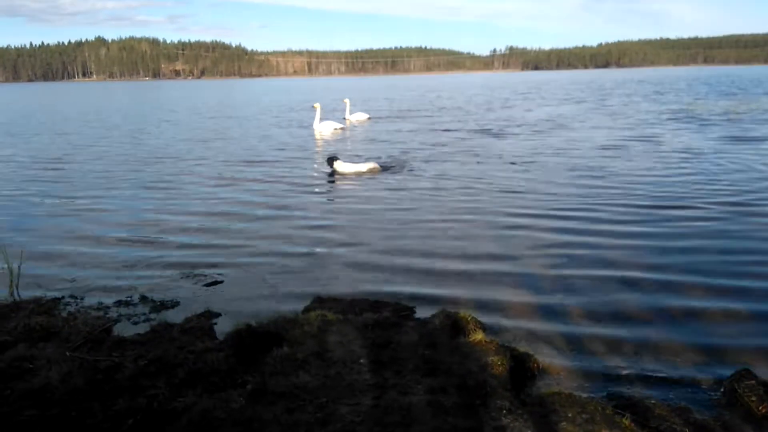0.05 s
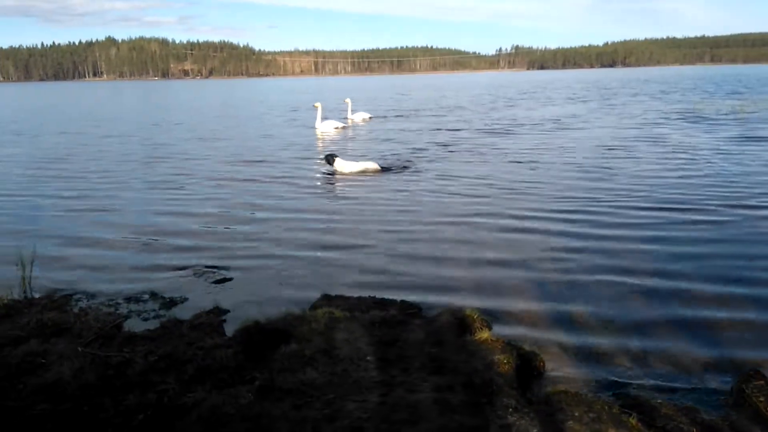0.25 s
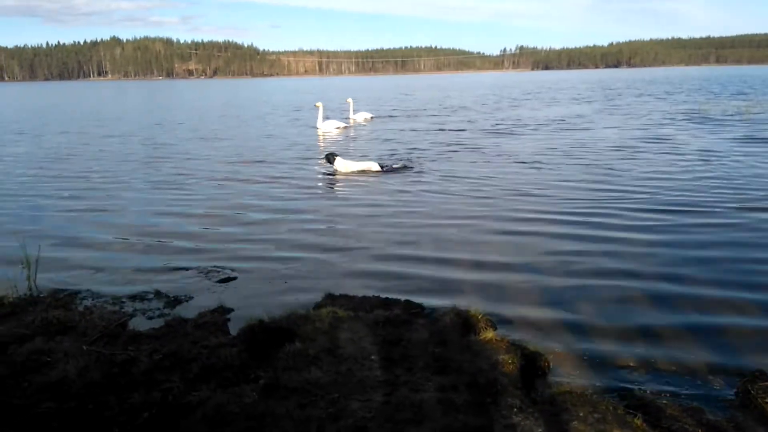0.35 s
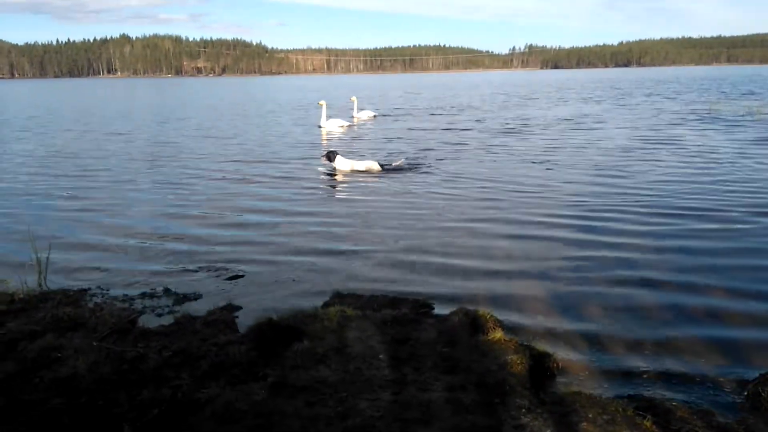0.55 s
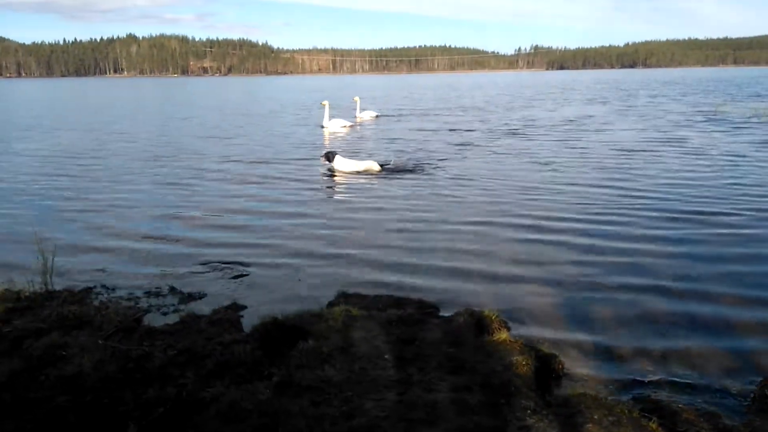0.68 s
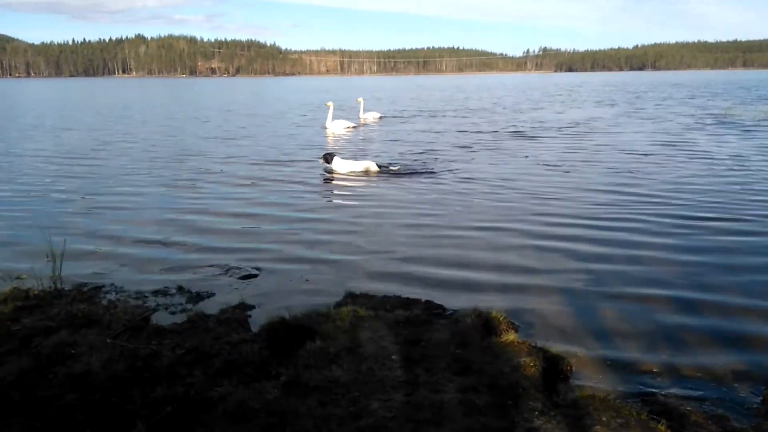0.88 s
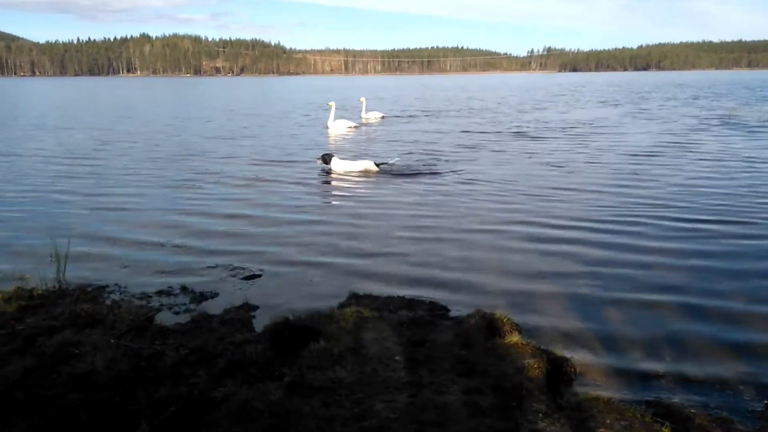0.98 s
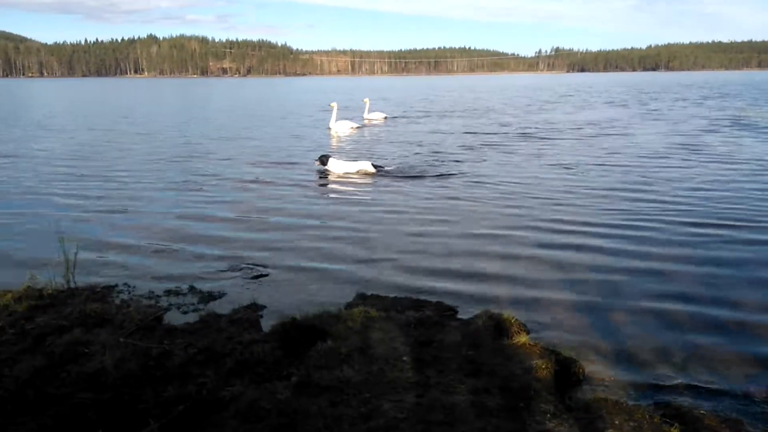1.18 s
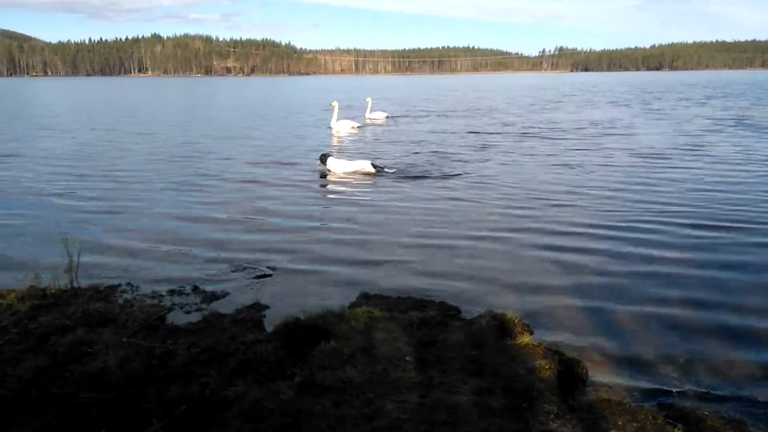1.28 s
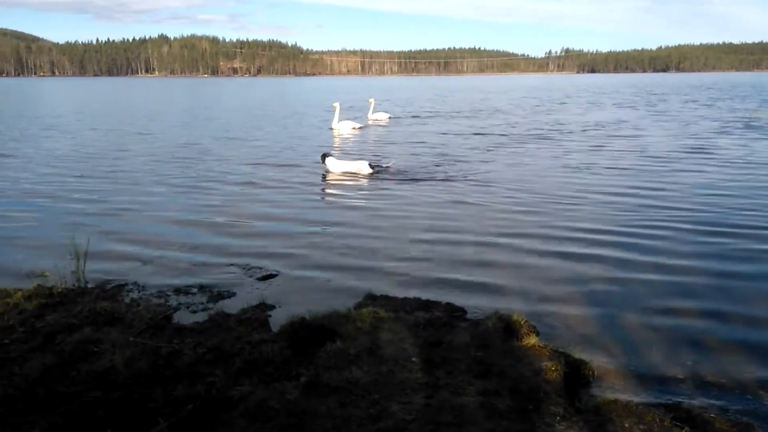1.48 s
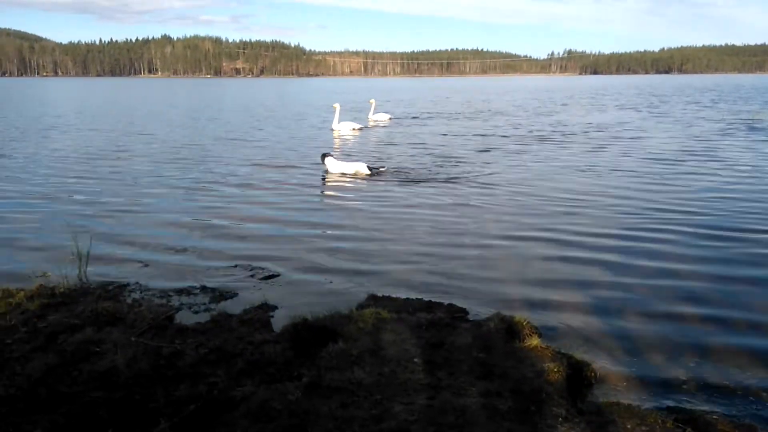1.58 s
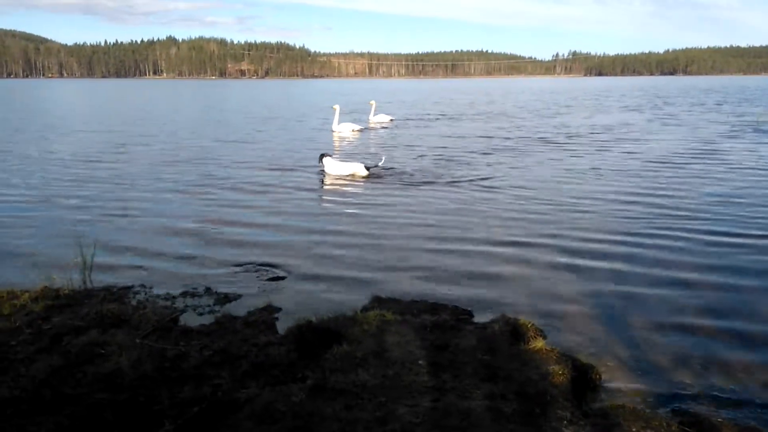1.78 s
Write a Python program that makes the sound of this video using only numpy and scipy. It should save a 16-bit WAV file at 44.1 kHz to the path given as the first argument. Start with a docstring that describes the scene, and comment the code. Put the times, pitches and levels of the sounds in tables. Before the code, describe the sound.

A swan honks loudly at about 0.2 seconds, a short, high bugle that cracks upward. A second swan replies from 0.4 to 0.5 seconds, lower and hoarser. Both calls leave a faint tail and a dull echo across the lake, fading by about 1 second. Low wind and thin ripples continue quietly throughout, with a few soft laps of water between 1.1 and 1.6 seconds, the clearest near 1.3.

```python
"""A low murmur of wind and a thin wash of ripples lie over a calm lake from start to end.
A swan honks, a high bugle that cracks upward; its windpipe rings as the call clears near the end.
The rocky shore scatters the sound and the forest round the lake returns a long faint tail.
A second swan gives a lower, hoarser reply, and then both calls come back dully from the far shore.
Last come a few soft laps and splashes."""
import sys
import numpy as np
from scipy import signal
from scipy.fft import rfft, irfft
from scipy.io import wavfile
from scipy.ndimage import uniform_filter1d, map_coordinates

SR = 44100
rng = np.random.default_rng(int(sys.argv[2]) if len(sys.argv) > 2 else 0)


def wav_out(sig):
    """Save sig, one row per channel (or a flat mono array), as 16-bit PCM at SR to the path in sys.argv[1]."""
    wavfile.write(sys.argv[1], SR, np.round(np.clip(np.atleast_2d(sig).T, -1, 1) * 32767).astype(np.int16))


N = 81585


def amp(db):
    """Turns decibels into a number to multiply by."""
    return 10 ** (np.asarray(db) / 20)


def unit(x):
    """Scales a signal to an average strength (rms) of 1."""
    return x / np.sqrt(np.mean(x ** 2) + 1e-20)


def by_hz(table, hz, column=1):
    """Reads between a table's rows by frequency, with octaves evenly spaced."""
    columns = np.transpose(table)
    return np.interp(np.log(hz + 1), np.log(columns[0] + 1), columns[column])


def by_time(table, t, column=1):
    """Reads between a table's rows by time."""
    columns = np.transpose(table)
    return np.interp(t, columns[0], columns[column])


def wobble(size, rate_hz):
    """A smooth random wiggle of strength 1, up to about the given speed."""
    hz = np.fft.rfftfreq(size, 1 / SR)
    return unit(irfft(rfft(rng.standard_normal(size)) / (1 + (hz / rate_hz) ** 4), size))


def add(mix, start_s, sound):
    """Mixes a stereo sound in at its start time."""
    part = mix[:, round(start_s * SR):][:, :sound.shape[1]]
    part += sound[:, :part.shape[1]]


def rushing_noise(tone, loudness, likeness, left_db, patchy_db, flicker_db):
    """Noise with drifting patches and a flicker; likeness (0 to 1) is how alike the two sides are."""
    frames, bands = N // 256 + 6, 513
    a, b, c, d, patches = rng.standard_normal((frames, bands, 5)).T
    patches = uniform_filter1d(patches, size=14, axis=0)  # smooth across frequency
    patches = unit(uniform_filter1d(patches, size=4, axis=1))  # and along time
    left = a + 1j * b
    right = likeness * left + np.sqrt(1 - likeness ** 2) * (c + 1j * d)
    patchy = np.array([left, right]) * amp(patchy_db * patches)
    noise = signal.istft(patchy, nperseg=1024, noverlap=768)[1][:, :N]
    noise = irfft(rfft(noise) * amp(by_hz(tone, np.fft.rfftfreq(N, 1 / SR))), N)
    noise = unit(noise * amp(flicker_db * wobble(N, 39)))
    return noise * amp(by_time(loudness, np.arange(N) / SR) + left_db * np.array([[.5], [-.5]]))


# The wind's mix of low and high sound: f/Hz, relative level/dB
WIND_TONE = [(20, -37.5), (80, -11.5), (120, -4.5), (225, 1.5), (290, -4), (375, -15.5), (530, -13),
             (750, -20.5), (1100, -33), (8000, -99)]
# How the wind swells and sinks: t/s, level/dB
WIND_LOUDNESS = [(0, -59.5), (.17, -56.5), (.28, -46.5), (0.374, -50), (0.482, -46.5), (0.569, -54),
                 (0.668, -50.5), (0.821, -54.5), (0.903, -47.5), (1.003, -57), (1.088, -52), (1.3, -53.5),
                 (1.362, -51), (1.43, -52), (1.85, -57.5)]
def wind():
    """Moving air murmurs low, almost alike in both ears."""
    return rushing_noise(WIND_TONE, WIND_LOUDNESS, likeness=.92, left_db=-2.5, patchy_db=1, flicker_db=1.47)


# The ripples' mix of low and high sound: f/Hz, relative level/dB
RIPPLE_TONE = [(100, -25), (600, 2.5), (2000, -1.5), (3900, -4), (4400, -10.5), (7000, -12), (14000, -15)]
# How loud the ripples are: t/s, level/dB
RIPPLE_LOUDNESS = [(0, -76), (.2, -71.5), (.9, -69.5), (1.28, -71), (1.38, -69.5), (1.85, -73)]
def ripples():
    """Tiny waves make a thin wash all around."""
    return rushing_noise(RIPPLE_TONE, RIPPLE_LOUDNESS,
                         likeness=0, left_db=0, patchy_db=2.24, flicker_db=-1)


TREBLE_HZ, RASP_CORNER_HZ, RING_WIDTH_HZ = 3530, 9100, 210
CATCH_S, RELEASE_S, CLEARING_S = .022, .016, .0033
JITTER_HZ, FLUTTER_HZ, FLUTTER_FADE_S = 237, 104.2, .046


def throat_gain(tone, hz):
    """How strongly each frequency of a voice reaches the left and right ear."""
    return amp([by_hz(tone, hz, column=1), by_hz(tone, hz, column=2)])


def rasp(phase, tone, bright_db):
    """A puff of air escapes with each vibration; its hiss thins out toward the low notes."""
    size = len(phase)
    hz = np.fft.rfftfreq(size, 1 / SR)
    puffs = rng.standard_normal((2, size)) * (1 + np.cos(phase))
    breath = rfft(puffs) * throat_gain(tone, hz) * hz / np.hypot(hz, RASP_CORNER_HZ)
    treble = hz ** 4 / (hz ** 4 + TREBLE_HZ ** 4)
    return irfft(breath * (1 - treble), size) + amp(bright_db) * irfft(breath * treble, size)


# How far a voice's wave runs ahead on the left side: f/Hz, lead/radians
LEFT_LEAD = [(600, 0.1594), (900, 0.13), (1700, 2.4), (3600, 7.76), (4500, 5.06), (14000, 9.1)]
def honk(call, tone, ring, clears_s, rasp_db, jitter, flutter, catch_jitter, release_jitter):
    """A firm note with quivering overtones and rasp; late in the call the windpipe rings."""
    t = np.arange(call[0][0], call[-1][0], 1 / SR)
    size, age = len(t), t - t[0]
    pitch = by_time(call, t)
    level = amp(by_time(call, t, column=2))
    bright_db = by_time(call, t, column=3)
    clear = .5 + .5 * np.tanh((t - clears_s) / CLEARING_S)
    hoarse = 1 - .5 * clear
    # The pitch shakes most as the voice catches and lets go; jitter and flutter are shares of it.
    unsteady = catch_jitter * np.exp(-age / CATCH_S) + release_jitter * np.exp((t - t[-1]) / RELEASE_S)
    waver = (jitter * hoarse + unsteady) * wobble(size, JITTER_HZ)
    waver += flutter * np.exp(-age / FLUTTER_FADE_S) * np.sin(2 * np.pi * FLUTTER_HZ * age)
    phase = 2 * np.pi * np.cumsum(pitch * (1 + waver)) / SR
    voice = np.zeros((2, size))
    for k in range(1, 20):
        hz = k * pitch
        angle = k * phase + by_hz(LEFT_LEAD, hz) * np.array([[.5], [-.5]])
        if k == 1:
            voice += amp(tone[0][1:])[:, None] * np.cos(angle)
        else:
            ring_db = clear * sum(db / (1 + ((hz - centre) / RING_WIDTH_HZ) ** 2) for centre, db in ring)
            effort_db = bright_db * (hz / TREBLE_HZ) ** .53  # higher overtones follow effort more
            shimmer_db = 2.4 * hoarse * wobble(size, FLUTTER_HZ)
            quiver = .11 * (hz / TREBLE_HZ) * hoarse * wobble(size, JITTER_HZ)
            gain = throat_gain(tone, hz) * amp(effort_db + ring_db + shimmer_db)
            voice += gain * np.cos(angle + quiver)
    breath = amp(rasp_db) * hoarse * rasp(phase, tone, bright_db) * (level / level.max()) ** .41
    out = np.zeros((2, N))
    add(out, t[0], (np.sqrt(2) * voice + breath) * level * signal.windows.tukey(size, .04))
    return out


# The first swan's call: t/s, pitch/Hz, level/dB, brightness/dB
BUGLE_CALL = [(.208, 755, -68, -45), (.213, 748, -42, -31), (.221, 764.5, -38, -9), (.228, 874, -33, -5),
              (.24, 904, -29.5, 3.5), (.247, 900, -23.5, -6), (.254, 900, -25, 2), (.265, 895, -25, -1),
              (.276, 900.3, -24, 2), (.287, 879.3, -27, 8), (.295, 936, -25, -8.5), (.301, 974, -36.5, -6),
              (.307, 968, -28, 2), (.322, 957.8, -31.5, -2), (.329, 954, -52, 2), (.338, 944.5, -36, -14),
              (.362, 800, -47.5, -10)]
# The tone of its voice: f/Hz, left level/dB, right level/dB
BUGLE_TONE = [(900, -3.5, 1), (1762, -19.5, -21.5), (2330, -51, -33), (2646, -27.5, -29),
              (2978, -17, -14.5), (3440, -13.5, -14.5), (4360, -15.5, -16.5), (5370, -22.5, -37),
              (5900, -54, -40.5), (7100, -46.5, -44), (8320, -32, -43.5), (9280, -37.5, -24.5),
              (9700, -41.5, -35.5), (13400, -45, -41)]
# Where its windpipe rings: f/Hz, boost/dB
BUGLE_RING = [(2900, 10.5)]
def first_swan():
    """A high bugle whose pitch cracks upward."""
    return honk(BUGLE_CALL, BUGLE_TONE, BUGLE_RING, clears_s=.312, rasp_db=8,
                jitter=.004, flutter=.03, catch_jitter=.045, release_jitter=.12)


def echo(sound, tone, fade_s, delay_s):
    """Many small reflections arrive at random and die away by 60 dB in fade_s."""
    size, bounces_per_s = 65536, 3000
    bounces = rng.choice([-1., 1.], (2, size)) * (rng.random((2, size)) < bounces_per_s / SR)
    hz, t, bands = signal.stft(unit(bounces), SR, nperseg=256)
    decay = np.log(1000) / fade_s
    fade = np.exp(-decay * t) * np.sqrt(2 * decay / SR)  # same energy at any length
    tail = signal.istft(bands * amp(by_hz(tone, hz)[:, None]) * fade, SR, nperseg=256)[1]
    out = np.zeros((2, N))
    add(out, delay_s, signal.fftconvolve(sound, tail, axes=1))
    return out


def blur(sound, sway_s):
    """The path over rippling water keeps changing in length, which smears an echo's pitch."""
    return np.array([map_coordinates(side, [np.arange(N) + sway_s * SR * wobble(N, rate_hz=35)])
                     for side in sound])


# What the rocks send back: f/Hz, level/dB
ROCK_TONE = [(500, -11), (900, -16.5), (1800, -7.5), (2900, 0), (3500, -10.5), (5200, -8),
             (6500, -3), (13000, -5)]
def rock_echo(calls):
    """Shore rocks scatter the calls almost at once."""
    return blur(echo(calls, ROCK_TONE, fade_s=.18, delay_s=.008), sway_s=.000015)


# What the forest sends back: f/Hz, level/dB
FOREST_TONE = [(300, -45), (850, -13), (1100, -26), (1600, -12), (3200, -11.5), (4200, -21.5), (5500, -15),
               (11000, -20)]
def forest_echo(calls):
    """The trees return a long faint tail."""
    return blur(echo(calls, FOREST_TONE, fade_s=.98, delay_s=.048), sway_s=.00007)


# The second swan's call: t/s, pitch/Hz, level/dB, brightness/dB
REPLY_CALL = [(.394, 497, -43, -5), (.402, 536.4, -36, -2), (.407, 680, -29.5, -9.5),
              (.423, 714.7, -26, -10.5), (.428, 790.5, -28.5, -6), (.444, 818, -27, 2.5),
              (.462, 792.6, -28, 0.5), (.482, 790, -29, -6), (.494, 782.3, -41, 0.5),
              (.505, 740, -36.5, -1.5), (.52, 741, -46.5, -43)]
# The tone of its voice: f/Hz, left level/dB, right level/dB
REPLY_TONE = [(800, -5, -1.5), (1250, -10.5, -2.5), (1644, -25.5, -21.5), (2400, -29, -25),
              (3320, -24, -22.5), (3950, -18, -31), (5500, -47.5, -47), (6400, -31.5, -36.5),
              (8200, -37.5, -30), (8600, -42, -55), (10060, -32.5, -30.5), (11260, -35, -33.5),
              (11400, -47, -46)]
# Where its windpipe rings: f/Hz, boost/dB
REPLY_RING = [(1580, 3.97), (3110, 14.2), (5420, 21.7)]
def second_swan():
    """A lower reply, made hoarse by more air and a shakier pitch."""
    return honk(REPLY_CALL, REPLY_TONE, REPLY_RING, clears_s=.479, rasp_db=17,
                jitter=.012, flutter=.038, catch_jitter=.052, release_jitter=.025)


# What the far shore sends back: f/Hz, level/dB
FAR_TONE = [(850, -33.5), (1600, -44)]
def far_shore_echo(calls):
    """The calls cross the lake and come back late and dull."""
    return echo(calls, FAR_TONE, fade_s=.59, delay_s=.405)


# Small laps and splashes: t/s, level/dB, f/Hz
LAPS = [(1.101, -62, 566), (1.262, -44, 242), (1.625, -69, 2980)]
def splashes():
    """Water laps and sprays in short bursts of noise, each round its own pitch."""
    rise_s, pitch_spread = .0048, .26
    out, t = np.zeros((2, N)), np.arange(4096) / SR
    hz = np.fft.rfftfreq(len(t), 1 / SR)
    burst = t / rise_s * np.exp(1 - t / rise_s)
    for start_s, db, centre_hz in LAPS:
        band = 1 / (1 + ((hz / centre_hz - 1) / pitch_spread) ** 2)
        spray = irfft(rfft(rng.standard_normal((2, len(t)))) * band)
        add(out, start_s, amp(db) * unit(spray) * burst)
    return out


def scene():
    """Both swans and their echoes, over wind and water."""
    calls = first_swan() + second_swan()
    echoes = rock_echo(calls) + forest_echo(calls) + far_shore_echo(calls)
    return wind() + ripples() + calls + echoes + splashes()


def record(dry):
    """Cuts away the very highest treble."""
    low_pass = signal.firwin(511, cutoff=14300, window=("kaiser", 9), fs=SR)
    return signal.oaconvolve(dry, low_pass[None], "same")


dry = scene()
out = record(dry)
wav_out(out)
```